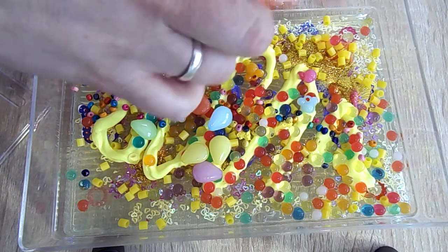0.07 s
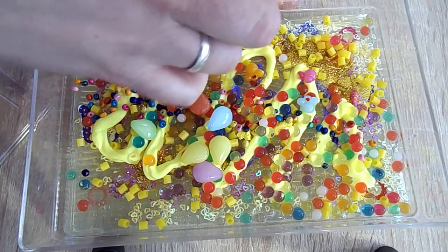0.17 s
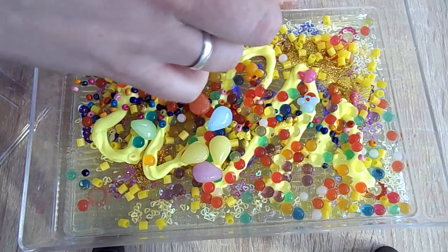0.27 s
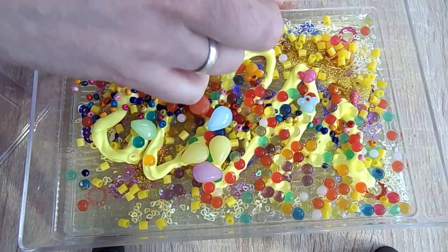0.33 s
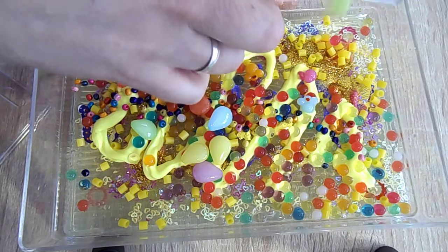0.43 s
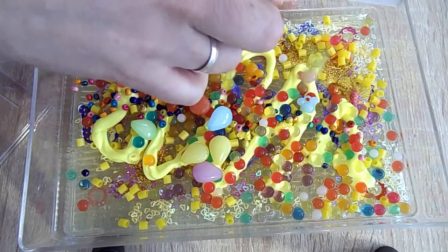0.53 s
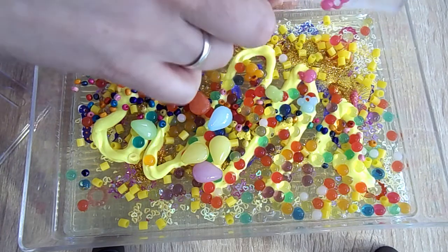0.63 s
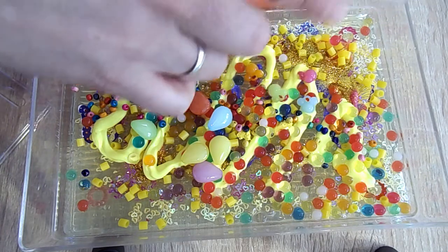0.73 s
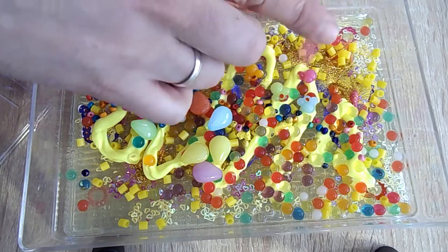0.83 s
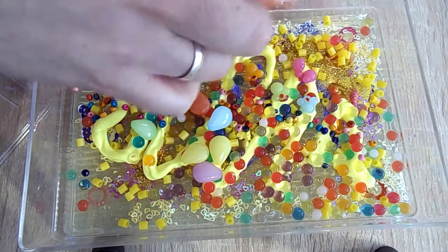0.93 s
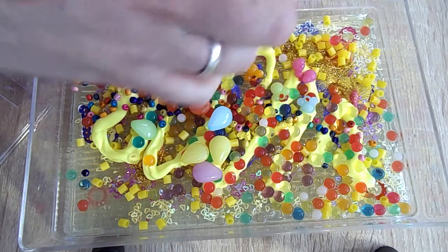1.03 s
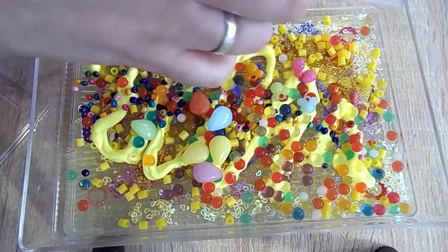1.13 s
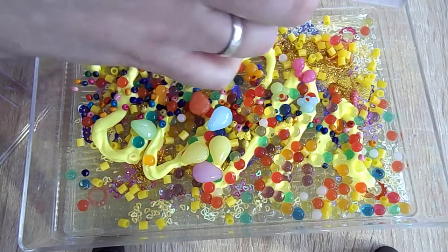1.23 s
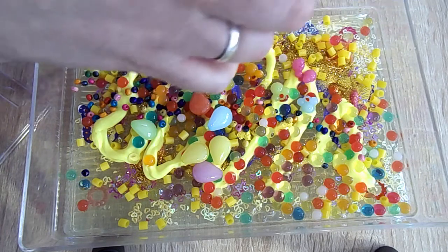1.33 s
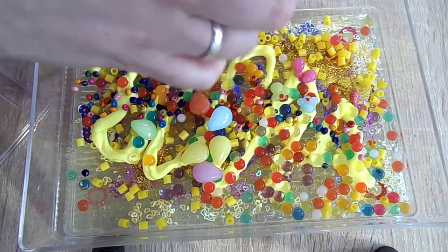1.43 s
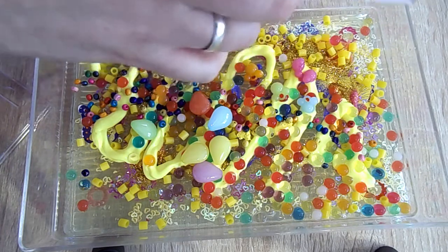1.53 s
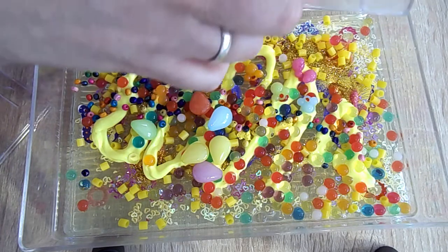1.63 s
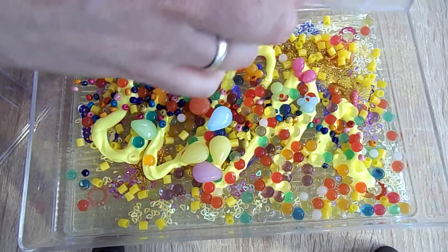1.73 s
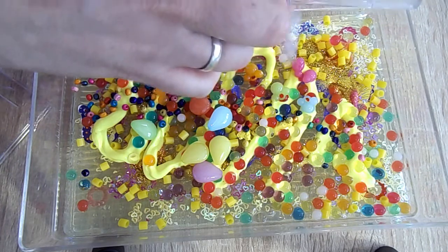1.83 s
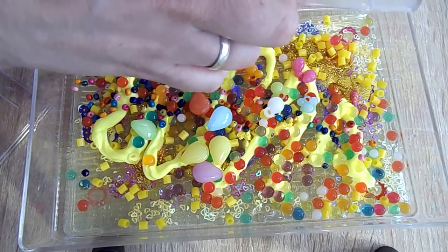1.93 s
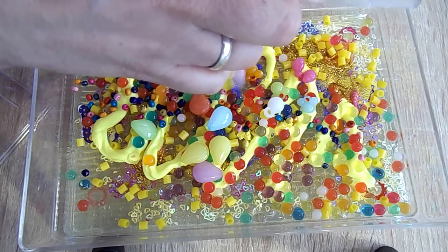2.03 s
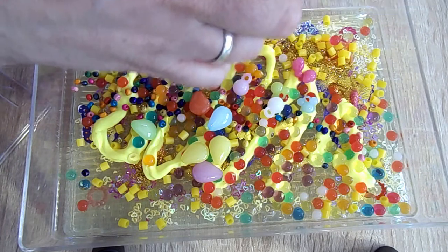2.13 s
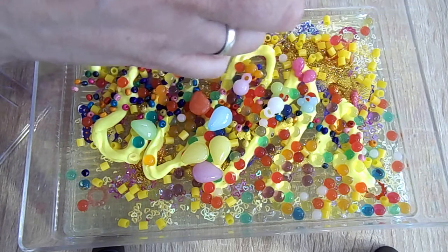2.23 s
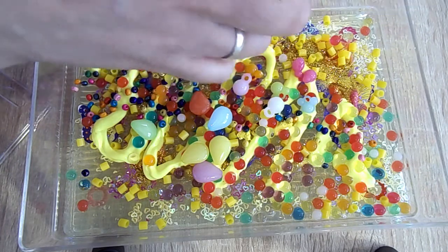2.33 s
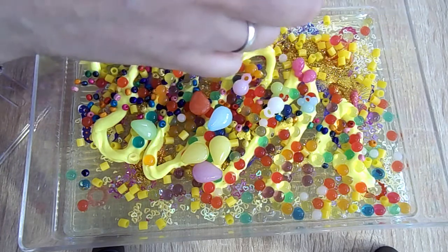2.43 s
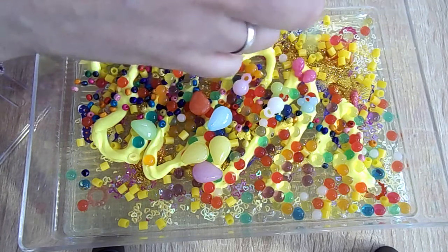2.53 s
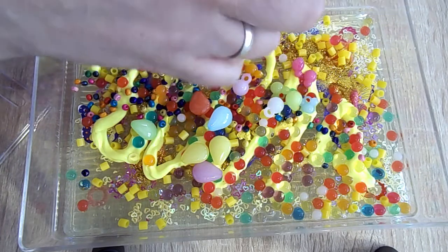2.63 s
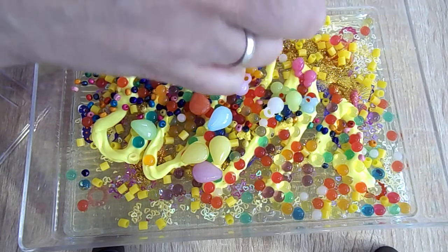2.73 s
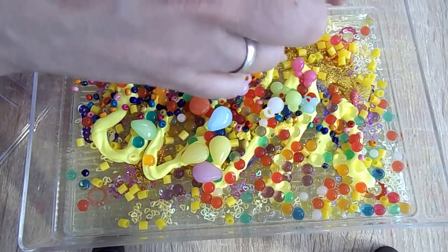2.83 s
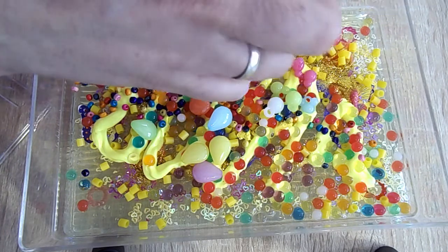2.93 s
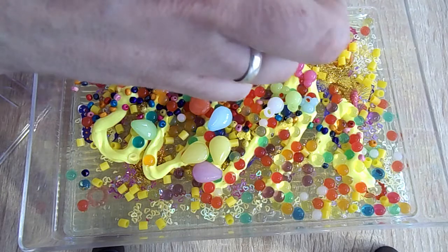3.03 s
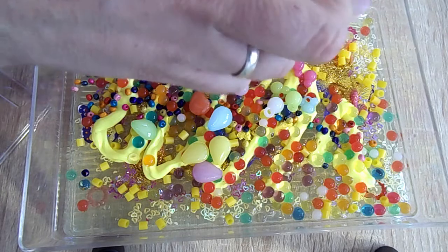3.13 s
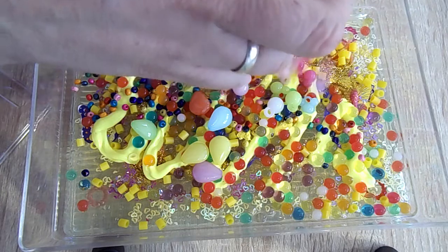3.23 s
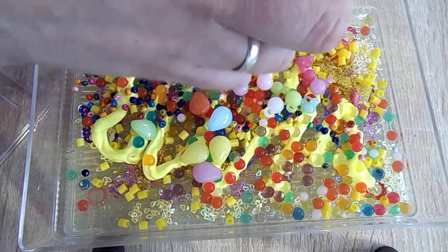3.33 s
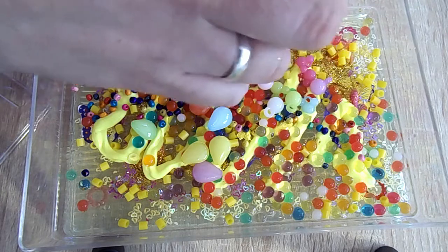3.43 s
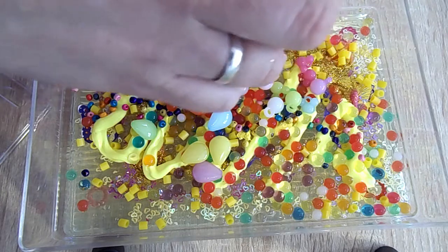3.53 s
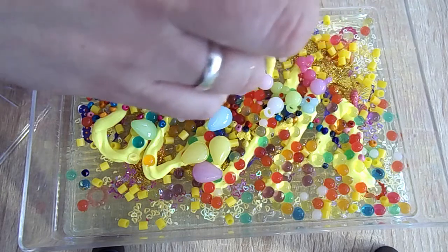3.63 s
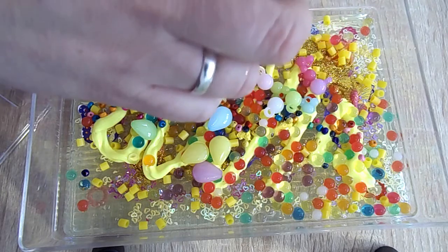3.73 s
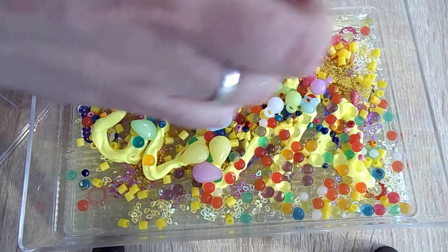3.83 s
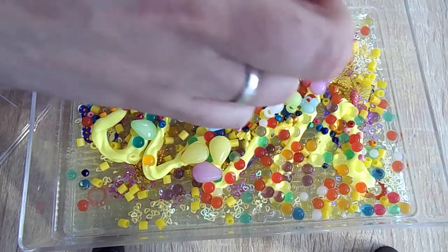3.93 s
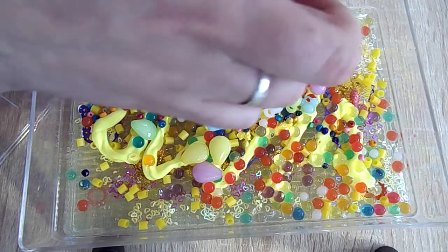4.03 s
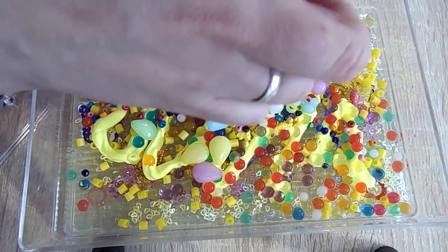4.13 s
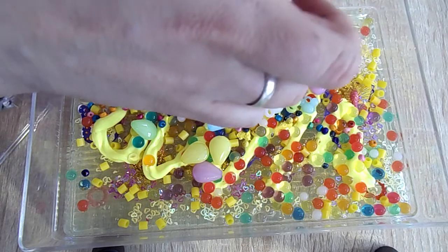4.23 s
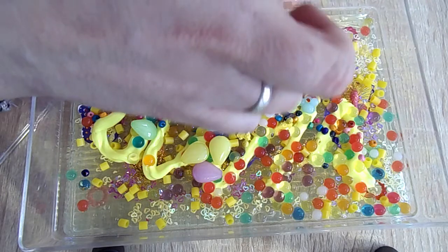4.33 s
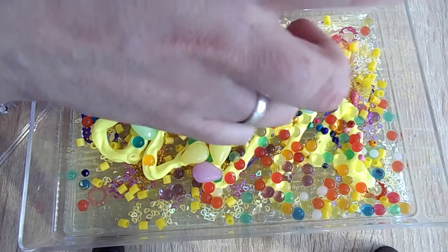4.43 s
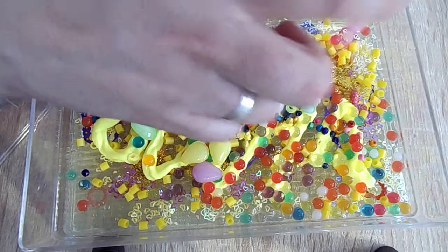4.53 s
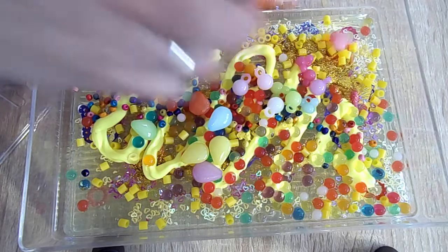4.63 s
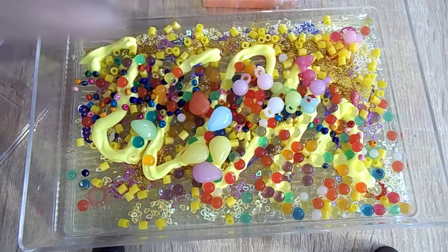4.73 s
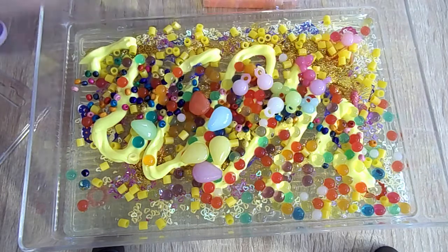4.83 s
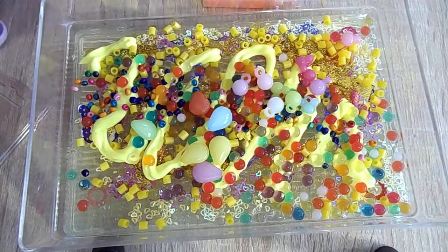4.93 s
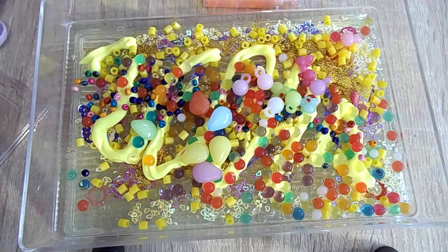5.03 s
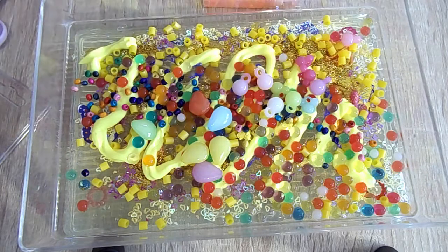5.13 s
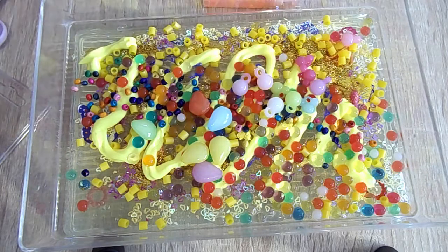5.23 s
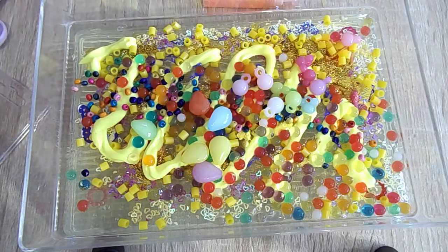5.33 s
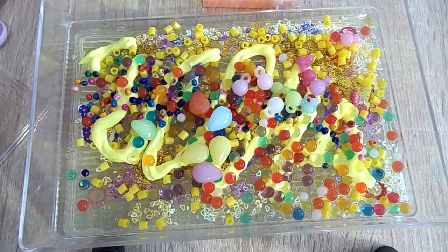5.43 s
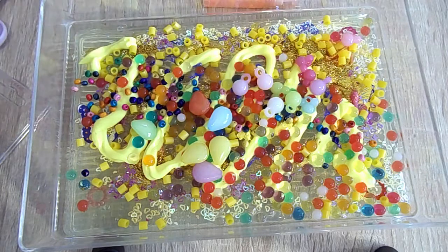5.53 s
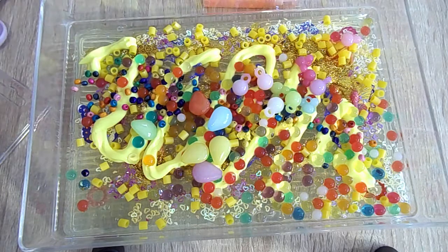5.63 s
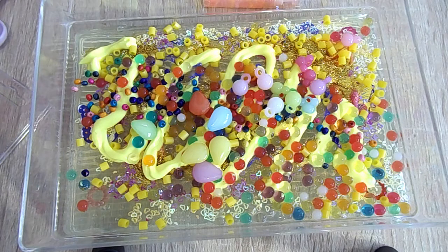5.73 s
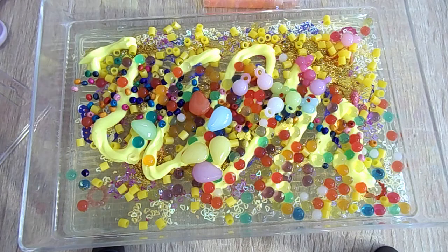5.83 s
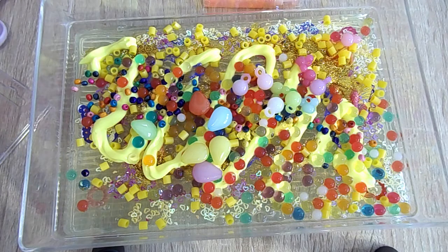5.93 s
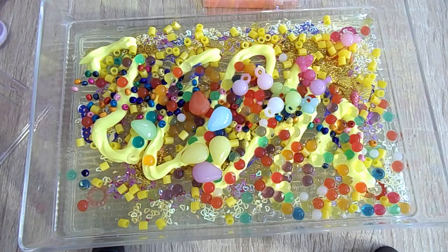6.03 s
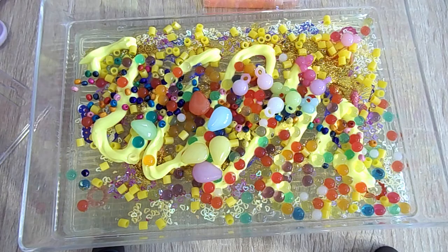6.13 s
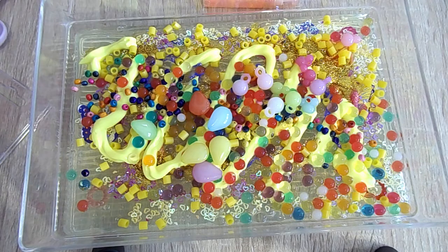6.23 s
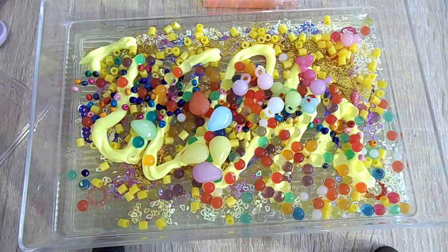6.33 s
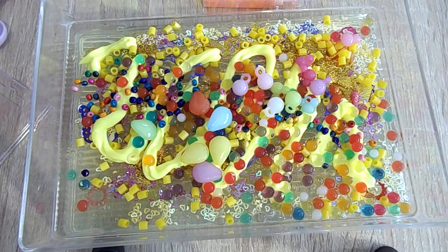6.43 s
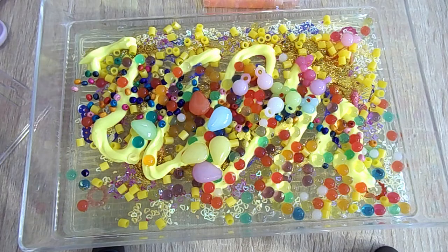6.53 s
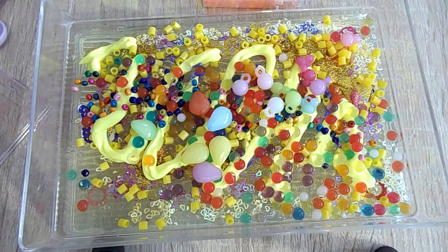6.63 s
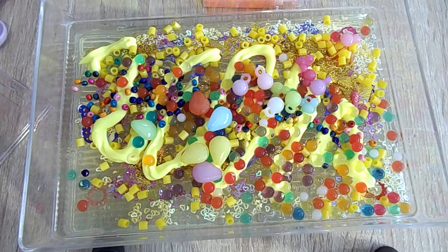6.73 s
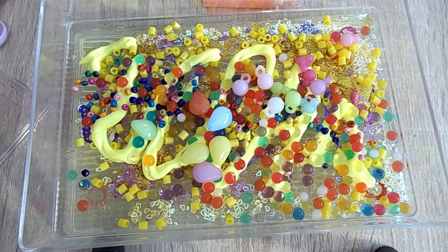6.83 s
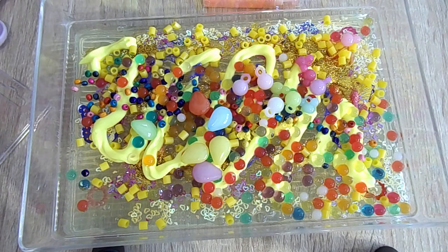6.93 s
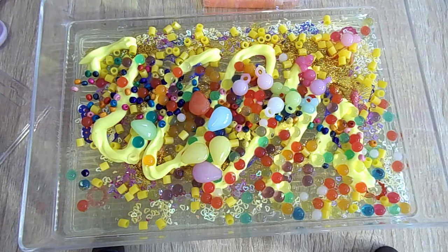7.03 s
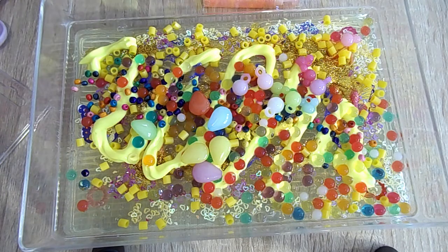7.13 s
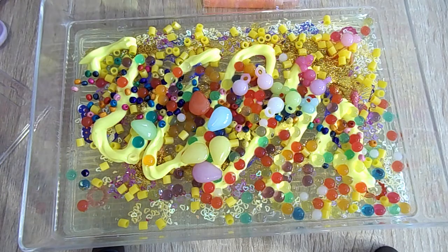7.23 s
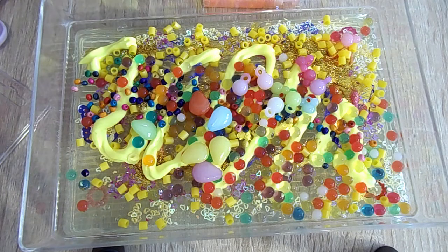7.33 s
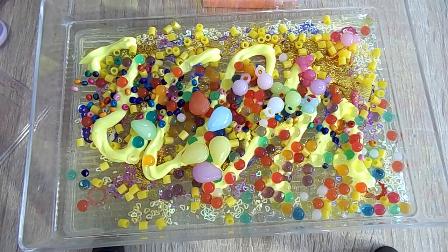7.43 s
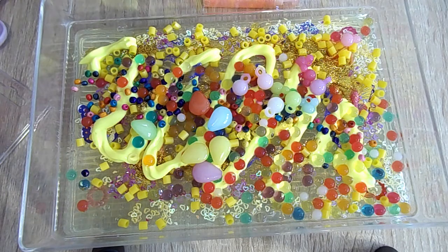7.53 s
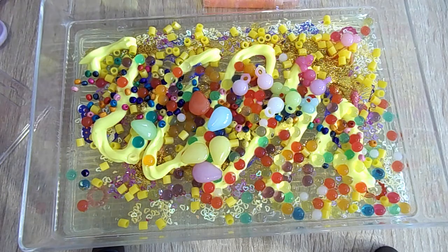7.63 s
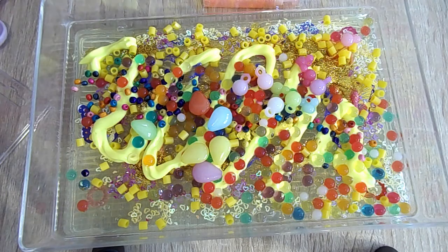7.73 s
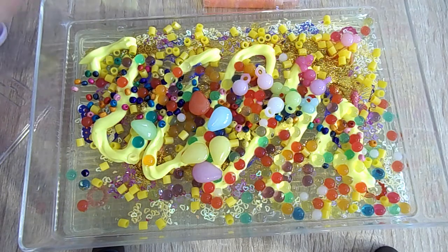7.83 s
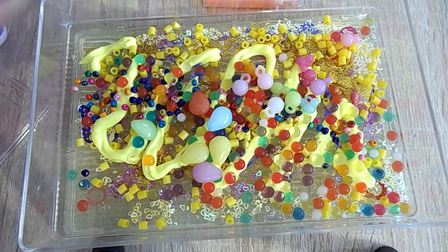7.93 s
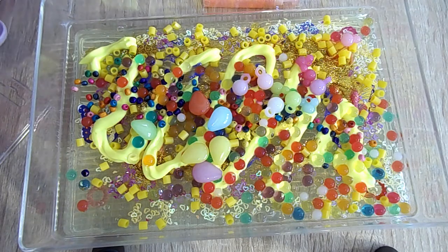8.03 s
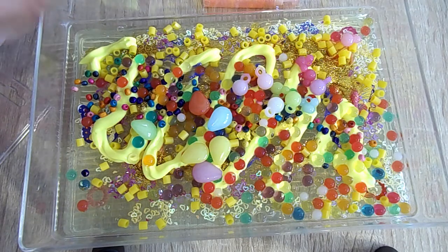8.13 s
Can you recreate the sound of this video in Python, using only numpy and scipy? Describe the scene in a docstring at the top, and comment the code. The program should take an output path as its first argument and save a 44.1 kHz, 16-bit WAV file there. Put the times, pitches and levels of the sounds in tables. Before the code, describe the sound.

Small hard beads fall from a box onto a thin plastic tray, bright, dry and clicky, heard by close microphones that give each tap a thin click just before its fuller strike. Bursts of clatter fade into isolated taps and faint finger rubbing. Then the box is knocked and slid briefly on the table, slightly further off. Quiet indoor hum remains, with a few muffled soft bumps near the end.

```python
"""Hard plastic beads drop and rattle from a small box onto a plastic tray: ringing modes plus bursts of noise.
Two close microphones are mixed, one 18 ms ahead: a tap is heard thin, then full; the loudest overload the mix.
Fingers brush plastic, as grains of noise ring the tray; the box is slid over the table, ringing its hollow body.
Last, something soft shifts and bumps further off, in dull resonances, with a very low sway.
Faint coloured room noise and a low rumble lie under it all; a short noise tail stands for the quiet room."""
import sys
import numpy as np
from scipy import signal
from scipy.fft import rfft, irfft
from scipy.io import wavfile
from scipy.ndimage import uniform_filter1d

SR = 44100
rng = np.random.default_rng(int(sys.argv[2]) if len(sys.argv) > 2 else 0)


def unload_audio(sound):
    """Save the sound as a 16-bit wav file, at the path given as the first command line argument."""
    columns = np.transpose(np.atleast_2d(sound))
    # keep every value between -1 and 1, then stretch to whole-number steps
    steps = np.round(np.clip(columns, -1, 1) * 32767)
    wavfile.write(sys.argv[1], SR, steps.astype(np.int16))


N = 360738  # samples

# modes of the plastic tray: pitch_hz, level_db, t60_s
TRAY_MODES = [(2935, -6, 0.014), (3268, -3.5, 0.011), (4190, -8, 0.012), (4260, -5.5, 0.021),
              (4702, -7, 0.019), (5500, 0, 0.017), (6370, -9.5, 0.017), (6850, -3.5, 0.018),
              (7340, -12, .018), (7770, -12, 0.021)]
# resonances of the soft thing further off: pitch_hz, width_hz, level_db
SOFT_RESONANCES = [(310, 52, -9), (802, 67, 5.5), (1160, 65, -6), (1617, 280, 1.5), (2314, 250, -10.5),
                   (2840, 200, -22), (3450, 250, -11)]
TABLE_S = 5.5  # from here on the knocks are on the table, further off


def undb(db):
    """Decibels to amplitude."""
    return 10 ** (np.asarray(db) / 20)


def unit(x):
    """Scale to an RMS of 1."""
    return x / np.sqrt(np.mean(x ** 2))


def band(x, lo_hz, hi_hz, order=2):
    """Band-pass by a Butterworth filter."""
    sos = signal.butter(order, [lo_hz, min(hi_hz, .45 * SR)], "band", fs=SR, output="sos")
    return signal.sosfilt(sos, x)


def fade(t, t60):
    """Exponential decay, 60 dB down after t60 seconds."""
    return np.exp(-np.log(1000) * t / t60)


def walk(rate):
    """Random levels joined by slopes of 1 / rate s; standard deviation near 0.7."""
    k = int(SR / rate)
    held = np.repeat(rng.standard_normal(N // k + 1), k)
    return 0.85 * uniform_filter1d(held, k)[:N]


def swells(rows):
    """Gestures (start_s, peak_s, end_s, level_db) that grow and die away as bell curves."""
    drop_db = 24  # below the peak, at the start and at the end
    out, t = np.zeros(N), np.arange(N) / SR
    for start, top, end, db in rows:
        # each side lasts at least 5 ms, even where the end stands ahead of the peak
        rise = (top - t) / max(top - start, .005)
        fall = (t - top) / max(end - top, .005)
        x = np.where(t < top, rise, fall)
        out += undb(db - drop_db * np.minimum(x, 3) ** 2)
    return out


def grains(rate, spread_db):
    """Random clicks, rate per second on average, of uneven size and either sign."""
    hit, size, sign = rng.random(N), rng.exponential(size=N), rng.standard_normal(N)
    return (hit < rate / SR) * undb(spread_db * np.minimum(size, 3)) * sign


def resonate(x, peaks, shift_db=0):
    """Parallel resonances; with shift_db each waxes and wanes as the contact point moves."""
    total = 0
    for k, (hz, width, db) in enumerate(peaks):
        ring = unit(band(x, hz - width / 2, hz + width / 2, order=1))
        level = undb(db + shift_db * walk(20)) * np.sqrt(width)
        total = total + (-1) ** k * level * ring
    return unit(total)


def taps():
    """Each bead strike reaches the early microphone brighter, then the main one; rows: close sound, room send."""
    # bead taps: start_s, peak_db (of a sine as strong as the loudest moment), early_mic_db re peak,
    # ring_hz (strongest ring), treble_db (raised by 8 dB in the strike), low_crack_db
    tap_list = [(0.0013, -13.5, -10.0, 5600, -18.5, -19.5), (0.0222, -10.0, -17, 6850.0, -14, -10),
                (0.0285, 2.5, -10.5, 6560, -5, -3.5), (0.0438, -15.5, -5.0, 5500.0, -16, -15),
                (0.0562, -17.5, -2, 7200, -23.5, -24), (0.1735, -11, -5, 2970, -11.5, -19.5),
                (0.1886, -24, -15, 2960, -11, -22), (0.197, -19.0, -17.0, 3010, -19.5, -5),
                (0.209, -22, -10.0, 4120, -22, -2.5), (0.2253, -19.5, -8.0, 4500, -27, -9.0),
                (0.2483, -7, -8.5, 6800, -18.5, -6), (0.2523, -12, -8.0, 6900.0, -8.5, -5.5),
                (0.278, -27, -10, 2900, -21, -20), (0.283, -20.5, -12.0, 2850.0, -21, -19.5),
                (0.3178, -12, -12, 6620, -12, -9.5), (0.3635, -1.5, -7, 7350, 4.0, -35.0),
                (0.3783, -16, -20, 5900, -24, -1.5), (0.3848, -10, -4, 5630, -18.5, -20.0),
                (0.4139, -7.5, -5.5, 6100, -8.5, -4), (0.491, -28, -7, 5430, -4, 6),
                (0.5221, -10, -9, 4750, 6.5, -10), (0.5271, -14, -10, 3360, 6.0, -5),
                (0.5812, -28.0, -27.0, 6930.0, -24, -20), (0.601, -28.5, -2.0, 2920, -14, -7),
                (0.6259, -18.5, -14, 5850, -12, -12), (0.7021, -11, -8.5, 6820, -20, -8),
                (0.8127, -13, -7, 5360, 3.0, 0), (1.157, -22, -7.5, 1700, -25.0, -8),
                (1.1625, -18, -6.5, 6020.0, -14, -1.5), (1.1725, -23.5, -7, 3450.0, -34.0, -6),
                (1.2212, -27, -12, 4430, -19, -20), (1.2298, -21, -7, 4330, -28, -23.5),
                (1.243, -30, -7, 5480, -18, 8), (1.26, -17.5, -30, 7000, -10.5, -11),
                (1.2675, -3.5, -9.5, 4750, -15.5, -10.0), (1.3068, -9.5, -8, 5930, -21.5, -7.5),
                (1.3128, -12.5, -5, 2860, -11.5, -11), (1.3304, -23, -3.5, 2920.0, -7.5, -7.0),
                (1.3376, -25.5, -4, 2010, -24.0, -5), (1.3767, -26, -4.5, 5550, -23.0, -0.5),
                (1.411, -28.5, -14, 3040, -35, -2.0), (1.5466, -23.0, -11.5, 5200.0, -19.5, -11.0),
                (1.5525, -21, -11.5, 6780, -17.0, -5), (1.5884, -10.5, -12.5, 4480, -17.5, -11.5),
                (1.627, -18.5, -21, 5730, -7.0, -16.5), (1.6479, -1.5, -11.5, 5710, -8.5, -15.0),
                (1.657, -4.5, -7.0, 5560, -13.5, -21.5), (1.6676, -4.5, 0.0, 4260.0, -2.5, -14.0),
                (1.6787, -1.5, -1.5, 5500.0, -12.5, -10.5), (1.6867, 1.0, 6, 4315, -17, -15.0),
                (1.703, -2.5, -4.5, 4200.0, 3.5, -14.0), (1.7087, 5, -2.0, 4050.0, -19.5, -21.0),
                (1.7223, -4, -3, 4070, -13.0, -17.0), (1.738, -5.0, 3.0, 4250, -18.5, -20.5),
                (1.7514, -5, -9.5, 4270.0, -17.5, -16.5), (1.7625, 13, -13, 5500.0, -16.5, -8),
                (1.7719, 5.5, -13.5, 5330, -7.5, -12.5), (1.8116, 2.5, -9.5, 4585, -22.5, -7),
                (1.8258, -10.5, -11.0, 5400.0, -24, 1.5), (1.848, -2.5, -11.5, 4150, -8, -11),
                (1.888, -4, -14.5, 6630, -16.5, -7), (1.9023, -17.0, -15.5, 4260.0, -22.0, -11.0),
                (1.9546, -16.5, -15, 6460, -24, 2), (1.973, -23, -6.5, 6550.0, -12.5, -3),
                (2.0, -13.5, -2.5, 4170, -16, -12.5), (2.011, -12, -5, 5500.0, -14, -17.5),
                (2.0955, -11, -13, 5530, -23.5, -3), (2.2756, -30, -9.5, 5660, -16.0, -4),
                (2.312, -25.0, -13.5, 4180, -10.5, -13.5), (2.3215, -18.5, -15, 5740.0, -17, -10),
                (2.3495, 6, -11, 5574, -13, -14), (2.3655, -6.5, -3, 5530, -3.5, -28),
                (2.3888, -4.5, -2.5, 5580, -9.5, -19.0), (2.4137, -11.5, -4, 5660, -6, -18),
                (2.4193, -12.5, -13, 6960, -8, -3), (2.471, -9.5, 0.5, 2860, -23, -3.5),
                (2.523, -23, -26.0, 12240.0, 3.0, -23.0), (2.533, -20.5, -2.0, 5700, 4.0, -29.0),
                (2.5402, -9.5, -6.0, 11760.0, 3.5, -5.5), (2.5462, -14.5, -23, 4770, -3, -10),
                (2.5903, -22, -19, 6050, 3, -25.0), (2.619, -25.5, -15, 4660, 3.5, -14.0),
                (2.7931, -37.5, -8.0, 6600, -9, -15), (2.9039, -8, -10.5, 4760, -18, -10.5),
                (2.9179, -15, -7, 4150, -42, -35.0), (2.9321, -22, -5, 4330, -44, -5),
                (3.0488, -5.5, -9.5, 7240, -10.5, -13.0), (3.1894, -11.5, -16, 11150, 17.0, -29.0),
                (3.1937, -24.5, -20, 6100, -17, -14), (3.1971, -11.5, -10, 5990, 13.0, 5),
                (3.2956, -39.0, -19.5, 4360, -20, -11.5), (3.8295, -40, -9, 4400, -26, -26),
                (3.8665, -26, -9.5, 3300, -26, -20), (3.8932, -9.5, -7, 7050, -9, -8.5),
                (3.907, -20, -5, 6750, -12, -12), (4.0589, -6.5, -10, 4400, -17, -4),
                (4.0952, -3, -2.5, 4210, -10, -11.5), (4.119, -8.5, -2, 4100, -29, -37.0),
                (4.1393, -5.5, -35, 5500, -31, -9), (4.2945, -41.5, -1, 2350, -35, -3),
                (4.3515, -47, -12, 4340, -25, -14), (4.4007, -44, 1, 3000, -25, -7),
                (4.5466, -10.5, -9.5, 5420, 2.5, 4.5), (4.634, -30, -11, 6720.0, 3.0, 10),
                (4.6622, -42, -8, 1956, -2, -8), (4.6775, -36.5, -10, 6540, 2.0, -16.0),
                (5.1066, -40, 0.5, 5150, -12.5, -15), (5.8228, -10, -5.5, 3100, -23, -1),
                (5.8332, -18, 1.5, 4520, -20, -5.0), (6.0672, -32, -20, 4404, -22, 9),
                (6.1658, 0, -12.5, 4880, -16, -3)]
    early_s, early_treble_db, early_low_db = .0183, 7.5, 2  # lead; treble gain; low crack gain
    hard_treble_db, hard_share = -7, 0.62  # bright taps are hard, quick contacts: times shrink to this share
    tray_db, tray_db_per_octave = -1.5, -1.5  # high beads drive the tray less
    table_tray_db, table_thud_db = -5, -7  # knocks on the table ring the tray less and thud less
    main_thud_db = -15.5
    out, bands = np.zeros((2, N + SR)), strike_noise()
    impulse = 1. * (np.arange(SR // 16) == 0)
    click = unit(band(impulse, 1198.5, 9000, order=1))
    for s, db, early_db, hz, treble_db, low_db in tap_list:
        on_table = s > TABLE_S
        quick = np.interp(treble_db, [hard_treble_db - 5, hard_treble_db + 4.0], [1, hard_share])
        ring_db = tray_db + tray_db_per_octave * np.log2(hz / 5000) + table_tray_db * on_table
        thud_db = main_thud_db + table_thud_db * on_table
        main = (s, db, 0, 0)
        early = (s - early_s, db + early_db, early_treble_db, early_low_db)
        for at, peak_db, more_db, low_more_db in (main, early):
            treble = min(treble_db + more_db, 3)
            blow = tap(hz, treble, low_db + low_more_db, ring_db, thud_db, quick, bands, click)
            if at >= 0:
                i = int(at * SR)
                out[:, i:i + blow.shape[1]] += undb(peak_db) * blow
    return out[:, :N]


def tap(ring_hz, treble_db, low_db, ring_db, thud_db, quick, bands, click):
    """One bead excites tray modes of chance strength, its own ring and noise bursts, then chatters to rest."""
    own_ring_db, own_ring_t60_s, scatter_db = 3, .016, 4
    crack_db, crack_t60_s, treble_t60_s, low_t60_s, thud_t60_s = -2, 0.0086, 0.0092, 0.01, 0.019
    contact_s, bounce_s, bounce_db = 0.00054, .007, -3  # contact time; bounces fall within bounce_s
    click_db = -2.5  # bare click in the room send, before the ring level is taken off
    t = np.arange(SR // 16) / SR
    modes = [*TRAY_MODES, (ring_hz, own_ring_db, own_ring_t60_s)]
    hz, db, t60 = np.transpose(modes)[:, :, None]
    level_chance, pitch_chance, phase = rng.standard_normal((3, len(hz), 1))
    rings = np.sin(2 * np.pi * hz * (1 + 0.016 * pitch_chance) * t + phase)
    body = (undb(db + scatter_db * level_chance) * fade(t, t60 * quick) * rings).sum(axis=0)

    start = rng.integers(SR - len(t))
    crack, treble, low, thud = bands[:, start:start + len(t)]
    blow = undb(ring_db) * body / np.std(body[:SR // 200])
    blow += undb(crack_db) * fade(t, crack_t60_s * quick) * crack
    blow += undb(treble_db + 8) * fade(t, treble_t60_s * quick) * treble
    blow += undb(low_db) * fade(t, low_t60_s * quick) * low
    blow += undb(thud_db) * fade(t, thud_t60_s) * thud
    blow *= np.clip(t / (contact_s * quick), 0, 1)

    # later bounces are weaker and push either way
    full = blow.copy()
    for lag, size in zip(rng.random(6), rng.standard_normal(6)):
        gain = undb(bounce_db) * quick * size * (1 - lag)
        full += gain * np.roll(blow, 1 + int(lag * bounce_s * SR))
    full = full / np.sqrt(2 * uniform_filter1d(full ** 2, size=40).max())
    sent = unit(blow) + undb(click_db - ring_db) * click
    return np.array([full, unit(sent) * np.std(full)])


def strike_noise():
    """One noise split into crack, treble, low crack and thud bands; every tap takes a slice."""
    noise = rng.standard_normal(SR)
    crack = unit(band(noise, 2300, 8500))
    treble = unit(band(noise, 7500, 12320, order=1))
    low = unit(band(noise, 1100, 2585))
    thud = unit(band(noise, 60, 1400, order=1))
    return np.array([crack, treble, low, thud])


def cavity(sent):
    """The air in the tipped box hums along while beads leave it: a narrow resonance driven by the taps."""
    # hum of the box air: start_s, peak_s, end_s, level_db re the taps at that pitch
    cavity_swells = [(1.7, 1.79, 1.95, 15), (2.33, 2.43, 2.485, 18)]
    pitch_hz, width_hz = 1916, 46
    return band(swells(cavity_swells) * sent, pitch_hz - width_hz / 2, pitch_hz + width_hz / 2, order=1)


def ring_tray(push, hiss_db):
    """Any push rings the tray's modes and leaks some bright hiss."""
    peaks = [(hz, np.log(1000) / np.pi / t60, db) for hz, db, t60 in TRAY_MODES]  # decay time to width
    hiss = unit(band(push, 2000, 21000, order=1))
    return unit(resonate(push, peaks) + undb(hiss_db) * hiss)


def rattle():
    """Small beads tumble between the taps: dense little collisions, each smeared by a short chatter."""
    # tumbling swells: start_s, peak_s, end_s, level_db
    rattle_swells = [(0.15, 0.39, 0.49, -34), (1.17, 1.296, 1.48, -39), (1.58, 1.74, 1.72, -20),
                     (1.78, 1.86, 2.076, -29), (1.9, 2.02, 2.06, -34), (2.3, 2.455, 2.5, -35.5),
                     (4.08, 4.16, 4.35, -55)]
    chatter = fade(np.arange(SR // 50) / SR, .015)
    hits = abs(grains(900, spread_db=2))
    push = signal.fftconvolve(hits, chatter)[:N] * rng.standard_normal(N)
    return swells(rattle_swells) * ring_tray(push, hiss_db=-8)


def brush():
    """Fingers brush plastic: fine grains of friction ring the tray."""
    # finger strokes: start_s, peak_s, end_s, level_db
    strokes = [(2.72, 2.8, 3.5, -59.5), (3.4, 3.66, 3.715, -51.5), (4.15, 4.36, 4.46, -58),
               (5.09, 5.157, 5.185, -41.5), (6.65, 6.72, 6.85, -60), (6.85, 6.95, 7.1, -64)]
    return swells(strokes) * ring_tray(grains(3400, spread_db=3.1), hiss_db=-5.0)


def slide():
    """Stick and slip of the box bottom rings the hollow box; its resonances wax and wane."""
    # pushes of the box over the table: start_s, peak_s, end_s, level_db (of the high part)
    pushes = [(5.815, 5.83, 5.9, -18), (5.88, 5.97, 6.05, -27), (6.06, 6.125, 6.17, -32.5)]
    # resonances of the hollow box, the first two low: pitch_hz, width_hz, level_db
    box_resonances = [(846, 33, 6.5), (1475, 310, -3), (2314, 103, -1), (3255, 130, 6), (4460, 73, 6.5),
                      (4920, 91, 0.5), (5500, 160, -2), (6400, 440, -9), (7360, 200, -16.5),
                      (9870, 320, -20)]
    low_part_db = -7.5
    push = grains(4000, spread_db=3.7)
    low = resonate(push, box_resonances[:2], shift_db=3.5) + undb(-11) * unit(band(push, 470, 2700))
    high = resonate(push, box_resonances[2:], shift_db=7.0)
    high = high + undb(-9.5) * unit(band(push, 2100, 5300, order=1))
    return swells(pushes) * (undb(low_part_db) * unit(low) + unit(high))


def shuffle():
    """Something soft shifts: dull, uneven rubbing whose upper resonances come and go with pressure."""
    # soft shifts: start_s, peak_s, end_s, low_part_db, high_part_db re low part
    shifts = [(7.19, 7.24, 7.6, -44.5, -11), (7.305, 7.409, 7.465, -34, 0),
              (7.504, 7.516, 7.6, -44.5, -3.5)]
    push = grains(2500, spread_db=2)
    low = resonate(push, SOFT_RESONANCES[:3], shift_db=5) + undb(-11.5) * unit(band(push, 156, 1300))
    high = resonate(push, SOFT_RESONANCES[3:], shift_db=3.5) + undb(-12) * unit(band(push, 1240, 4300))
    low_swells = swells(row[:4] for row in shifts)
    high_swells = swells((*at, db + high_db) for *at, db, high_db in shifts)
    return low_swells * unit(low) + high_swells * unit(high)


def bumps():
    """Each bump is a short, decaying push of noise into the same soft resonances."""
    # soft bumps within the shifting: start_s, peak_db (the noise's RMS starts 6 dB below)
    bump_list = [(7.265, -27.5), (7.331, -44), (7.347, -36), (7.518, -31), (7.543, -41)]
    t, out = np.arange(N) / SR, 0
    for s, db in bump_list:
        out = out + undb(db) * (t >= s) * fade(np.maximum(t - s, 0), 0.069)
    return out * resonate(rng.standard_normal(N), SOFT_RESONANCES[1:], shift_db=8.5) / 2


def sway():
    """A very low, slow sway late on: an 18 Hz sine under swells."""
    # swells of the sway: start_s, peak_s, end_s, level_db (RMS)
    sway_swells = [(7.2, 7.7, 8.14, -45)]
    return swells(sway_swells) * np.sqrt(2) * np.sin(2 * np.pi * 18 * np.arange(N) / SR)


def rumble():
    """Low noise in two parts, the deep one wandering; both swell when the table is loaded or knocked."""
    # rumble swells: start_s, peak_s, end_s, deep_db, upper_db
    rumble_swells = [(0, 0.053, .6, -59, -54.5), (1.507, 1.753, 2.14, -54.5, -46.5),
                     (3.98, 4.103, 3.9, -60, -53), (5.799, 6.097, 6.75, -49, -69)]
    deep_db, upper_db, wander_db = -58.5, -65.5, 3.5  # wander_db scales the random walk
    deep = unit(band(rng.standard_normal(N), 12, 36, order=4))
    upper = unit(band(rng.standard_normal(N), 44, 75, order=4))
    deep_level = undb(deep_db + wander_db * walk(1.9)) + swells(row[:4] for row in rumble_swells)
    upper_level = undb(upper_db) + swells((*at, db) for *at, _, db in rumble_swells)
    return deep * deep_level + upper * upper_level


def room_noise():
    """Steady room noise: random noise coloured by a smooth spectrum."""
    # colour of the room noise: pitch_hz, level_db (relative, per Hz)
    noise_colour = [(53, -41.5), (90, -17), (201, -6), (260, -6), (345, -3), (376, -13.5), (410, -5.5),
                    (620, -5), (786, -2), (858, -10), (1910, -13.5), (2090, -9), (2650, -18.5), (3360, -17),
                    (16000, -30)]
    hz, db = np.transpose(noise_colour)
    f = np.maximum(np.arange(N // 2 + 1) * SR / N, 1)
    colour = undb(np.interp(np.log(f), np.log(hz), db))
    air = irfft(rfft(rng.standard_normal(N)) * colour, N)
    return undb(-54.5) * unit(air)


def room(x, stretch=1):
    """The walls return a short tail of noise bands; the highest dies first."""
    # bands of the tail: centre_hz, level_db (relative), t60_s (before any stretch)
    tail_bands = [(500, -0.5, 0.21), (1530, 1, 0.21), (3760, -4, .3), (7400, -2.5, 0.26),
                  (12800, -8.5, .12)]
    t = np.arange(SR // 2) / SR
    tail = 0
    for hz, db, t60 in tail_bands:
        noise = band(rng.standard_normal(len(t)), hz / 1.5, hz * 1.43)
        tail = tail + undb(db) * fade(t, t60 * stretch) * noise
    onset = np.clip(t / 0.0033, 0, 1)
    tail = onset * tail / np.sqrt(np.sum(tail ** 2))
    return undb(-16) * signal.fftconvolve(x, tail)[:N]


def scene():
    """Mix the near taps, the rubbing, the walls and the background."""
    close, sent = taps()
    close = close + cavity(sent)
    rubbing = slide() + shuffle() + bumps()
    far = np.arange(N) > TABLE_S * SR
    # sounds on the table have a louder, longer tail
    walls = room(sent * ~far) + undb(3) * room((sent + rubbing) * far, stretch=1.44)
    background = room_noise() + rumble() + sway()
    return (close + rubbing + walls + rattle() + brush() + background)[None]


def record(dry):
    """The mix clips at full scale, then a steep low-pass cuts the top."""
    top_hz = 15800
    clipped = np.clip(dry, -1.0, 1.0)
    return signal.sosfilt(signal.ellip(10, .2, 60, top_hz, fs=SR, output="sos"), clipped)


dry = scene()
out = record(dry)
unload_audio(out)
```